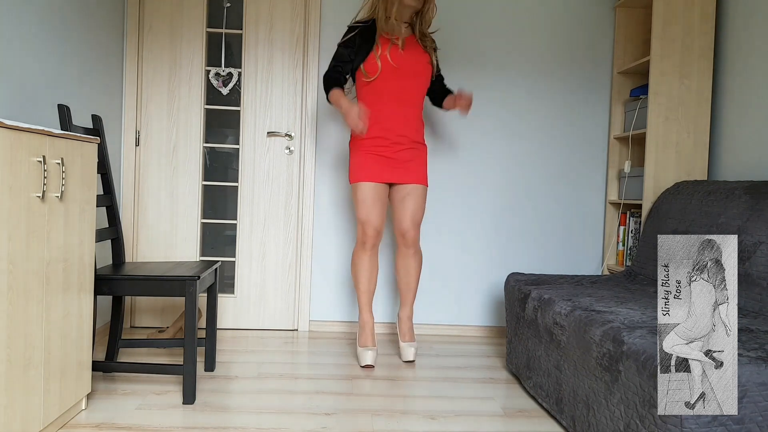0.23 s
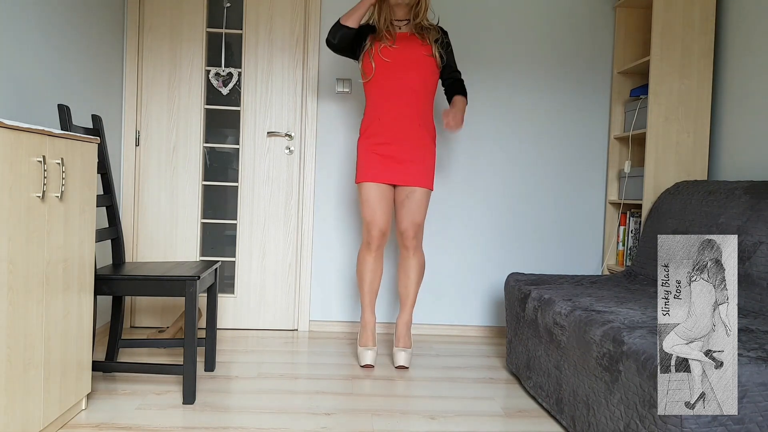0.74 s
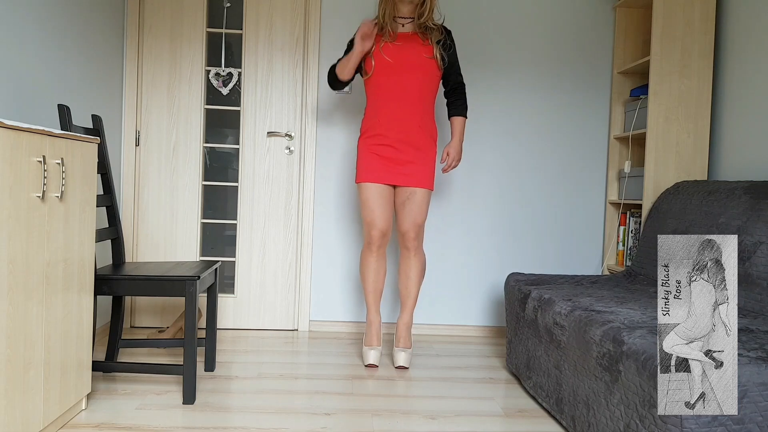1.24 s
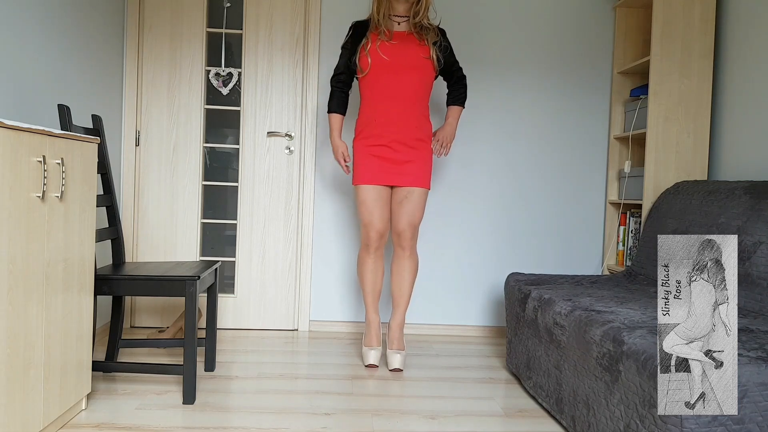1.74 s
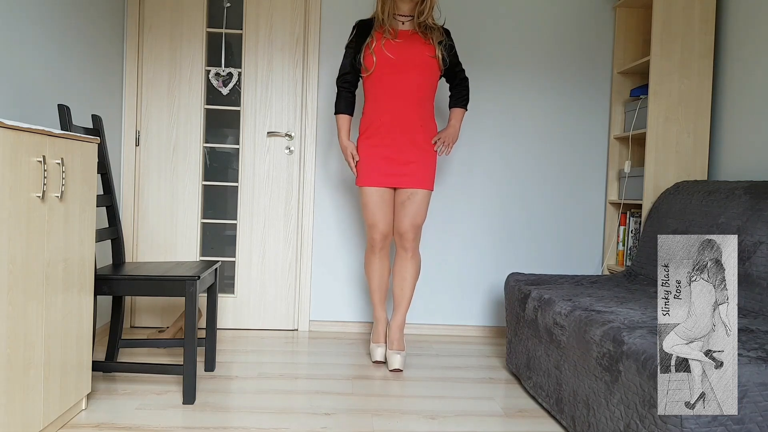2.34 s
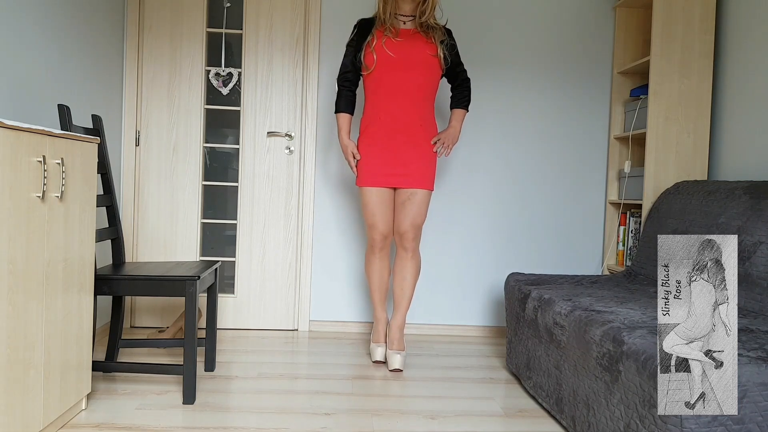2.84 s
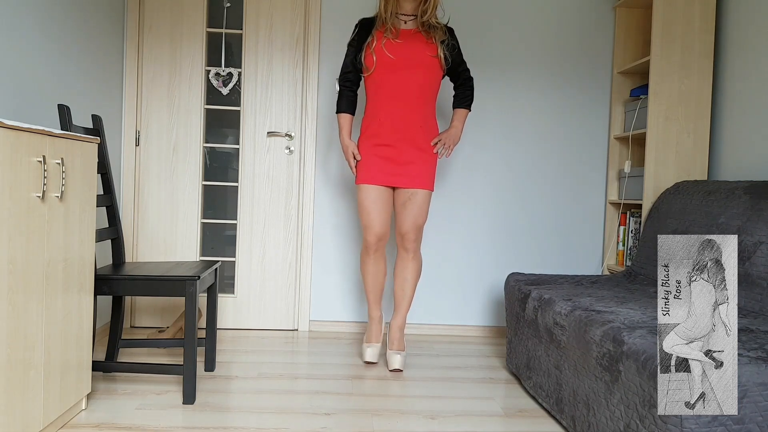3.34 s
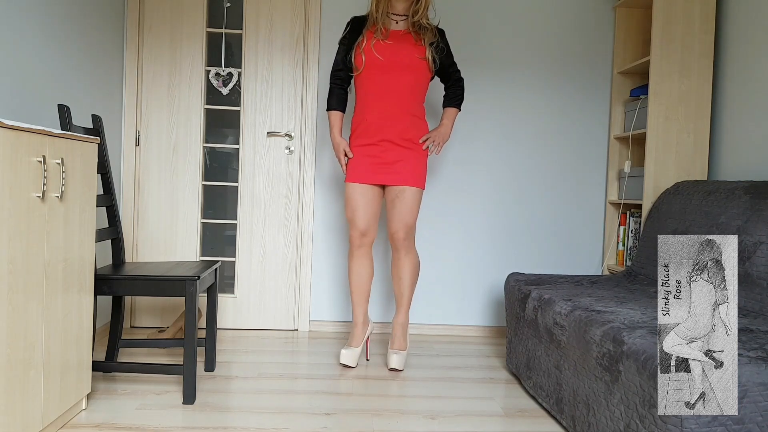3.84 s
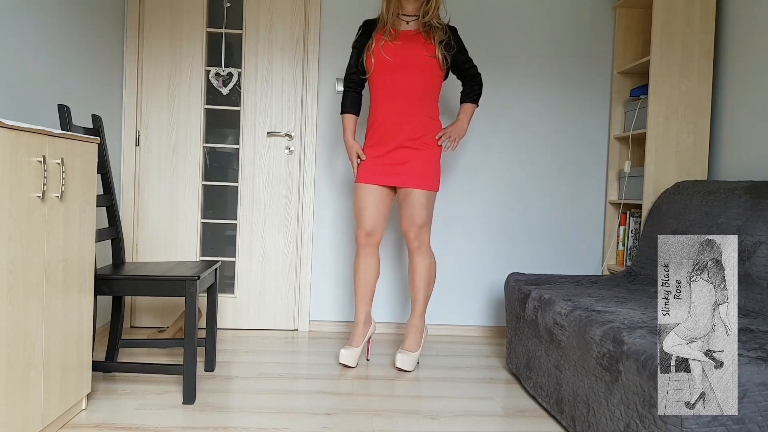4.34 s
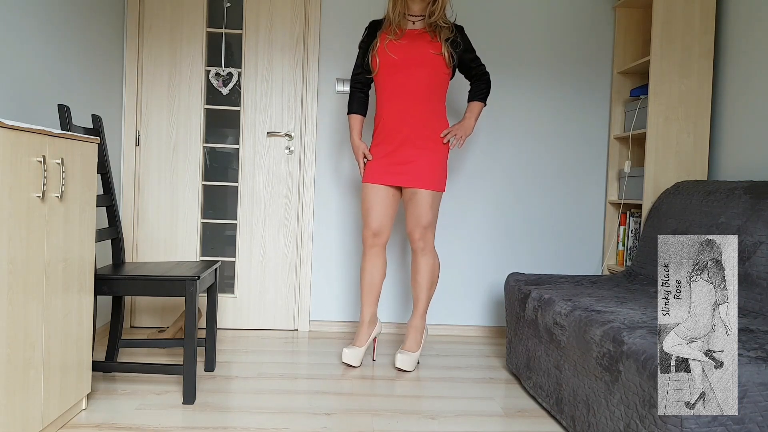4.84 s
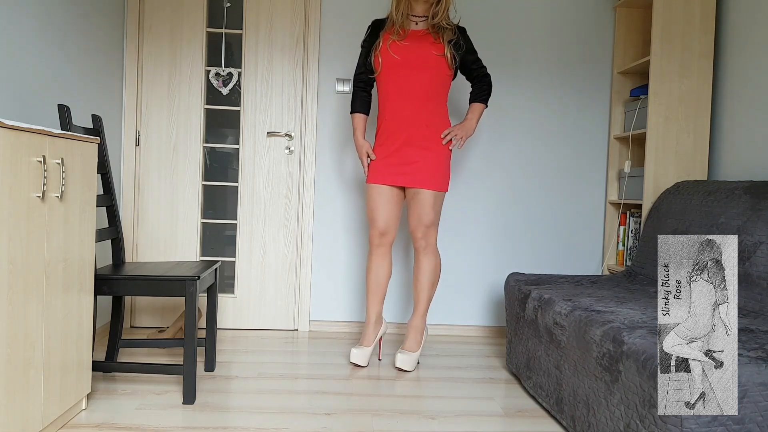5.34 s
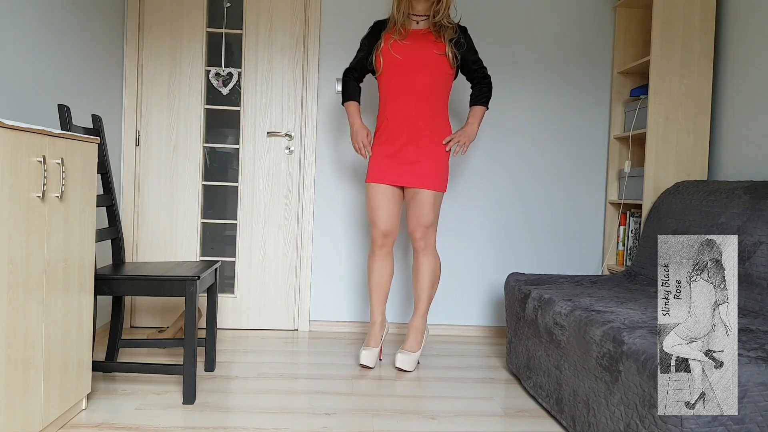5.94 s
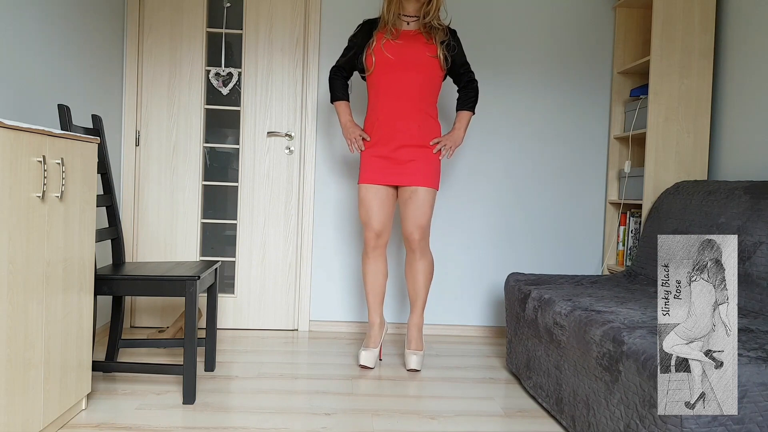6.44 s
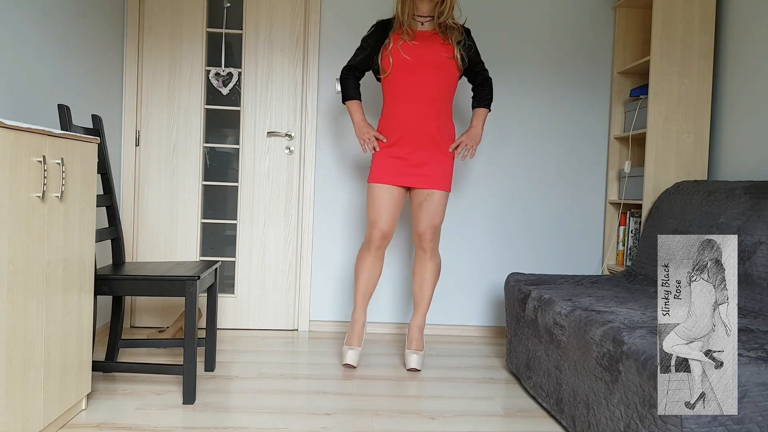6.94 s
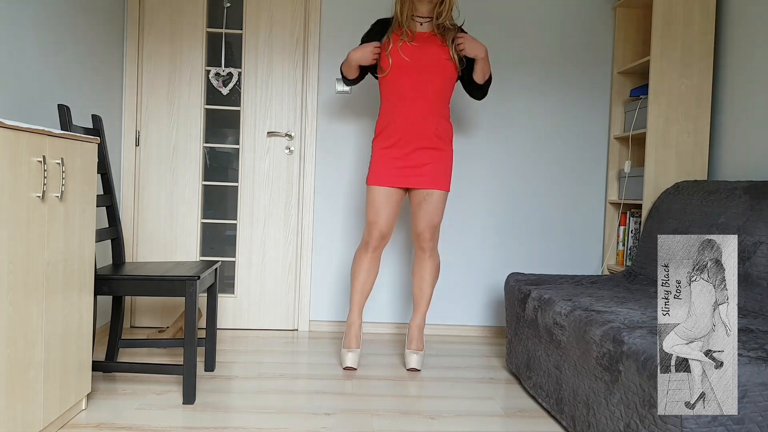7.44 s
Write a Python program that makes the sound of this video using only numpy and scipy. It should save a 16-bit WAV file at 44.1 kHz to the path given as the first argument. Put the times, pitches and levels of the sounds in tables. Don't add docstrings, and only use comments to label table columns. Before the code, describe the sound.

A person in high heels shifts in place on a laminate floor in a small furnished room. Sharp, woody heel knocks fall irregularly, the strongest at the start, half a second, just after four and five seconds, and near seven. Lighter taps, short scuffs and faint board creaks fill some gaps. The microphone stands a few metres away, catching short room reverberation over low hum and soft hiss.

```python
import sys
import numpy as np
from scipy import signal
from scipy.fft import rfft, irfft, next_fast_len
from scipy.io import wavfile
from scipy.ndimage import uniform_filter1d, map_coordinates

SR = 44100
rng = np.random.default_rng(int(sys.argv[2]) if len(sys.argv) > 2 else 0)


def ratio(d):
    e = np.asarray(d, float) / 20
    return 10 ** e


def put_to_file(sound):
    columns = np.atleast_2d(sound).T
    safe = np.clip(columns, -1, 1)
    whole_steps = np.round(safe * 32767)
    wavfile.write(sys.argv[1], SR, whole_steps.astype(np.int16))


N = 339744

# (delay [ms], level [dB], left-right difference [dB], left lag [ms])
NEAR_WALLS = [(0, -1, 0, 0), (1.9, -5, 1, -.4), (3.5, 0, 1, 0), (4.6, -4, 1, -.2), (5.8, -3, 0, -.3),
              (7.3, -5, 0, .2), (9.2, 0, 0, 0), (11.3, -3, 0, -.2)]
# (delay [ms], level [dB], left-right difference [dB], left lag [ms])
FAR_WALL = [(13.3, 1, -2, 0), (15.2, -3, 0, .1)]
# (frequency [Hz], level [dB], decay time T60 [s])
ROOM_MODES = [(173.6, -4.5, 0.36), (239, -25, 1), (266.6, -7, 0.35), (317, -1, 0.15), (369.4, -1.5, 0.13),
              (390, -16, 0.57), (502, -14, 0.62), (546, 0, 0.23), (580, -18, 0.28), (694, -2.5, 0.27),
              (774.3, 6, 0.17), (841, 3, 0.22), (1020, -18, 0.22)]
# (frequency [Hz], decay time T60 [s])
TAIL_DECAY = [(100, 0.27), (260, 0.43), (700, 0.28), (1800, 0.59), (5000, 0.91), (12000, 0.73)]
# (frequency [Hz], correlation [-1 to 1])
TAIL_LIKENESS = [(60, 0.64), (180, 1), (550, 0.69), (1650, 0.1), (4960, 0.094), (15000, 0.16)]
# (time [s], level [dB], board pitch [Hz],
# relative thud [dB], relative far wall [dB])
STEPS = [(-0.012, -28.5, 540, -20.5, 2), (0.5165, -41, 474, -21, 7), (0.5262, -24, 506, -20.5, 2.5),
         (1.771, -36, 574, -16.5, 3), (1.8604, -41, 400, -14, -1), (2.2368, -37, 597, -15, 6),
         (2.489, -45, 635, -16, 2), (3.7103, -40.5, 580, -17, -9), (3.7475, -41.5, 653, -21, -4),
         (4.1684, -50, 473, -10, 10), (4.2401, -28, 563, -24.5, 5), (4.9227, -44.5, 556, -26, 8),
         (5.263, -30, 577, -24.5, 0), (6.5705, -39.5, 570, -15.5, 8), (6.7651, -34, 600, -27, 9),
         (7.2016, -31, 488, -17.5, -12)]
# (time [s], level [dB], board pitch [Hz], relative snap [dB])
TAPS = [(0.0453, -61, 525, -20), (0.2107, -64, 497, 3), (0.3203, -57, 380, 0), (0.9792, -52.5, 1020, 6),
        (1.156, -57, 676, -32), (1.194, -57.5, 610, -31), (1.2454, -53.5, 613, -34),
        (1.2915, -57, 650, -25), (1.554, -61, 438, -14), (1.5755, -58, 503, -12), (1.6042, -58.5, 760, 4),
        (1.868, -43, 880, -1.5), (2.1205, -62, 614, 6), (3.8795, -76, 524, -6), (3.9666, -61, 625, 2),
        (4.44, -64, 563, 1), (4.4724, -63.5, 805, 6), (4.611, -52, 600, -27), (4.7863, -58, 570, -12),
        (6.0859, -58.5, 433, -18), (6.397, -62, 500, -9), (6.4418, -56.5, 500, -1), (6.478, -57.5, 780, 2),
        (7.2275, -50.5, 530, -7), (7.5979, -61.5, 503, -7)]
# (frequency [Hz], level [dB])
HUM_SPECTRUM = [(12, -35), (20, -20), (22, -4), (82, -8), (117, -7), (265, -8), (401, -8), (576, -11.5),
                (653, -13.5), (1500, -15.5), (1950, -76), (3300, -120)]
# (frequency [Hz], width [Hz], level [dB])
HUM_MODES = [(45, 29, 3), (100, 4, 1.5), (330, 14.3, 7.5), (428, 8.3, 9.5), (668, 16, 6.5)]
# (frequency [Hz], correlation [-1 to 1])
HUM_LIKENESS = [(30, 0.9), (60, 0.63), (180, 0.72), (550, 0.63), (1650, -0.059), (4960, -0.65),
                (15000, -0.56)]
# (frequency [Hz], density [dB per Hz])
HISS_SPECTRUM = [(900, -34), (1500, -7.5), (1700, 0), (2600, -4), (4000, -10), (5500, -11.5), (7000, -15.5),
                 (8500, -16.5), (10000, -18), (12000, -12.5), (13500, -11), (14500, -11.5)]
# (time [s], peak level [dB], relative brightness [dB], relative fizz [dB])
TIP_CLICKS = [(.002, -43.5, -5, -24), (0.213, -57.5, -6, -13), (.32, -49.5, -29, -37),
              (0.5176, -49.5, 5, -22), (.526, -36.5, -2, -12.5), (0.536, -62, -4, -5.5),
              (.979, -52.5, -4, -18), (1.602, -54.5, -16, -25), (1.771, -49, -4, -21),
              (1.861, -54.5, -5, -13), (2.12, -56.5, -0.5, -16), (2.234, -46, -1, -44),
              (2.489, -54, -24, -23), (3.71, -53.5, -8, -15), (3.748, -65, 0, -14), (4.168, -55.5, -7, -14),
              (4.24, -41, -31, -24), (4.44, -57, -23, -25), (4.472, -58, -25, -25), (4.921, -55, -15, -22),
              (5.261, -45.5, -12, -31), (6.084, -67, -8, -14), (6.4053, -45.5, -4, -24),
              (6.417, -56, -8, -23), (6.443, -56, -20, -24), (6.57, -55, -3.5, -26), (6.762, -43, -20, -33),
              (7.201, -52.5, -5, -29), (7.228, -52, -8, -20), (7.598, -71, -8, -15)]
# (frequency [Hz], density [dB per Hz])
FIZZ_SPECTRUM = [(5000, 0), (7000, 0), (9000, 0), (11500, 3.5), (14500, 1)]
# (frequency [Hz], density [dB per Hz])
GRIT_SPECTRUM = [(1100, -37), (1700, 0), (2600, -3.5), (3500, -5.5), (5500, -10.5), (7500, -19),
                 (10000, -46)]
# (frequency [Hz], width [Hz], level [dB])
BOARD_MODES = [(324.6, 38, 2.5), (515, 85, -8.5), (723, 140, -11)]
# (middle time [s], length [s], rub level [dB], relative grit [dB], relative fizz [dB])
SLIDES = [(0.165, 0.13, -59, -13, -17), (0.73, 0.16, -58, -3.5, -9), (1.295, 0.3, -76, 3, -3.5),
          (1.59, 0.11, -67.5, -5, -11), (2.034, 0.14, -53.5, -11.5, -22), (2.135, 0.066, -56.5, -19, -21),
          (3.494, .12, -76, -3, 0), (3.94, .11, -55.5, -9.5, -19.5), (4.232, 0.036, -53.5, -19, -28),
          (4.47, 0.14, -66, -20, -20), (4.598, .1, -66.5, -2, -12), (4.818, 0.13, -74, 1.5, -24),
          (5.12, 0.16, -67, -2, -14), (5.55, 0.048, -89, 3, -3), (6.017, 0.088, -75.5, -2, -1),
          (6.388, 0.074, -61.5, -9, -21), (6.49, .08, -61, -22, -32), (6.717, 0.15, -50.5, -15, -30),
          (6.902, 0.087, -59, -9, -17), (7.124, 0.16, -72.5, 1.5, 0.5), (7.43, 0.24, -77, 3.5, -3),
          (7.6, 0.19, -68.5, -5.5, -11)]
# (middle time [s], length [s], level [dB], relative upper resonances [dB])
CREAKS = [(0.196, 0.19, -63, -7), (0.362, 0.042, -62.5, -1), (0.676, 0.28, -60, -9),
          (1.222, 0.15, -64, 4.5), (1.563, 0.15, -63, -9), (1.943, 0.089, -65.5, 4),
          (2.073, 0.12, -60.5, -3), (3.59, 0.06, -70, -17), (3.937, 0.14, -58, -1.5), (4.236, .04, -68, 6),
          (4.476, 0.11, -66, 2.5), (4.588, 0.082, -62, 4), (4.815, 0.2, -69.5, -1),
          (5.095, 0.081, -66.5, 7), (6.376, .11, -61.5, -2), (6.483, 0.072, -64, -2), (6.694, 0.22, -63, 2),
          (6.894, 0.066, -63, 5.5), (7.13, 0.059, -70, 0), (7.44, 0.045, -67, -4), (7.62, 0.14, -66, -15)]

LEAD, SPAN = SR // 10, 16384
STEP_FIRST_DB, TAP_FIRST_DB = 1.5, 4
STEP_SNAP_DB, TAP_THUD_DB, TAP_FAR_DB = -28, -17.5, -12
HUM_DB, HISS_DB = -63.5, -70.5
TICK, SPRAY_T60 = 5, 0.4
EDGE_DB, LINGER = -7.5, 1.42
TOP_HZ = 14550


def unit(x):
    return x / np.sqrt(np.mean(x ** 2) + 1e-20)


def along(points, hz):
    f, v = np.transpose(points)
    return np.interp(np.log(hz + 1), np.log(f + 1), v)


def filtered(x, response):
    m = next_fast_len(x.shape[-1] + 4096)
    spectrum = rfft(x, m) * response(np.fft.rfftfreq(m, 1 / SR))
    return irfft(spectrum, m)[..., :x.shape[-1]]


def resonance(f, hz, width_hz):
    damping = 1j * f * width_hz
    return damping / (hz * hz - f * f + damping)


def stereo(pair, likeness):
    def mid_side(f):
        angle = np.arccos(np.clip(along(likeness, f), -1, 1)) / 2
        return np.array([np.cos(angle), np.sin(angle)])

    mid, side = filtered(pair, mid_side)
    return np.array([mid + side, mid - side])


def wobble(rate):
    knots = rng.standard_normal(int(N * rate / SR) + 4)
    return map_coordinates(knots, [np.arange(N) * rate / SR])


def reflections(f, walls, scatter_db):
    ear = np.array([[0.5], [-0.5]])
    total = 0
    for ms, db, pan, lag in walls:
        level = ratio(db + rng.normal(0, scatter_db) + pan * ear)
        total = total + level * np.exp(-2j * np.pi * f * (ms + lag * ear) / 1000)
    return total


def tail(t):
    hz, u, z = signal.stft(rng.standard_normal((2, len(t))), SR, nperseg=256)
    decay = ratio(-60 * u / along(TAIL_DECAY, hz)[:, None])
    wash = signal.istft(z * decay, SR, nperseg=256)[1][:, :len(t)]
    ring = 0
    for hz, db, t60 in ROOM_MODES:
        level = ratio(db + rng.normal(0, 1.7) - 60 * t / t60)
        ring = ring + level * np.sin(2 * np.pi * (hz * t + rng.random((2, 1))))
    swell = 1 / (1 + np.exp((0.019 - t) / 0.005))
    return swell * stereo(ratio(-19.5) * wash + ratio(-39.5) * ring, TAIL_LIKENESS)


def add_blow(out, s, source, first_db, far_db):
    size = SPAN + SPAN // 4
    t, f = np.arange(SPAN) / SR, np.fft.rfftfreq(size, 1 / SR)
    near = ratio(first_db) * reflections(f, NEAR_WALLS[:3], scatter_db=2.1)
    near = near + reflections(f, NEAR_WALLS[3:], scatter_db=3.5)
    far = ratio(np.clip(far_db / 2, -6, 5)) * reflections(f, FAR_WALL, scatter_db=0.5)
    room = near + far + rfft(tail(t), size)
    out[:, LEAD + round(s * SR):][:, :SPAN] += irfft(source(f) * room)[:, :SPAN]


def heels():
    out = np.zeros((2, N + SR))
    blows = [(s, db, hz, STEP_SNAP_DB, thud_db, STEP_FIRST_DB, far_db)
             for s, db, hz, thud_db, far_db in STEPS]
    blows += [(*row, TAP_THUD_DB, TAP_FIRST_DB, TAP_FAR_DB) for row in TAPS]
    for s, db, hz, snap_db, thud_db, first_db, far_db in blows:
        def source(f):
            board = resonance(f, 1.027 * hz, 0.86 * hz) ** 2 / np.sqrt(hz / 500)
            board = board + ratio(-2.5) * resonance(f, 355, 133) * resonance(f, 470, 470)
            snap = ratio(snap_db + 1) * resonance(f, 1170, 900) ** 2
            thud = resonance(f, 158, 127) ** 2 - ratio(-5.5) * resonance(f, 110, 76) ** 2
            thud = ratio(thud_db + 10.5) * thud
            soft = 1 / (1 + 1j * f / 1700) ** 3
            return -ratio(db + 34.5) * (board - snap - thud) * soft

        add_blow(out, s, source, first_db, far_db)
    return out[:, LEAD:LEAD + N]


def room_hum():
    z = signal.stft(rng.standard_normal((2, N)), nperseg=512)[2]
    field = uniform_filter1d(rng.standard_normal(z.shape[1:]), 6, 0)
    field = uniform_filter1d(field, 12, 1)
    pair = signal.istft(z * ratio(1.7 * unit(field)), nperseg=512)[1][:, :N]

    def colour(f):
        peaks = sum(db * abs(resonance(f, hz, width)) ** 2 for hz, width, db in HUM_MODES)
        return ratio(along(HUM_SPECTRUM, f) + peaks)

    level = ratio(HUM_DB + 0.56 * wobble(4.306))
    return level * unit(filtered(stereo(pair, HUM_LIKENESS), colour))


def microphone_hiss():
    hiss = filtered(rng.standard_normal((2, N)), lambda f: ratio(along(HISS_SPECTRUM, f)))
    return ratio(HISS_DB + 0.06 * wobble(0.54)) * unit(hiss)


def tips():
    out, t = np.zeros((2, N + SR)), np.arange(SPAN) / SR
    for s, db, bright_db, fizz_db in TIP_CLICKS:
        spray = stereo(rng.standard_normal((2, SPAN)), TAIL_LIKENESS) * ratio(-60 * t / SPRAY_T60)
        spray *= 1 - 0.6 * np.exp(-t / 0.004)
        spray[:, 0] += TICK

        def colour(f):
            tick = resonance(f, 2110, 2190) ** 2
            low = ratio(3.5) * resonance(f, 1130, 550) ** 2
            bright = ratio(bright_db + 1) * resonance(f, 4420, 2720) ** 2
            balance_db = np.array([[-1.2], [1.2]])
            dust = ratio(fizz_db - 4.5 + along(FIZZ_SPECTRUM, f) + balance_db) * (f > 4000)
            return tick - low - bright + dust

        out[:, round(s * SR):][:, :SPAN] += ratio(db) * filtered(spray, colour)
    return out[:, :N]


def strokes(rows, db):
    grid = np.arange(0, N / SR + 0.002, 0.002)
    middle, length = np.transpose(rows)[:2, :, None]
    u = 2 * (grid - middle) / np.maximum(length, 0.02)
    u = u / np.where(grid > middle, LINGER, 1)
    gain = np.linalg.norm(ratio(db[:, None] + EDGE_DB * u ** 2), axis=0)
    return np.interp(np.arange(N) / SR, grid, gain)


def slips(rough_db):
    return stereo(rng.standard_normal((2, N)), TAIL_LIKENESS) * ratio(rough_db * wobble(90))


def creaking_boards(modes):
    def response(f):
        total = sum((-1) ** k * ratio(db) * resonance(f, hz, width) for k, (hz, width, db) in enumerate(modes))
        return total * resonance(f, 490, 600)

    return unit(filtered(slips(rough_db=2.5), response))


def creaks():
    level_db, upper_db = np.transpose(CREAKS)[2:]
    low = strokes(CREAKS, level_db) * creaking_boards(BOARD_MODES[:1])
    return low + strokes(CREAKS, level_db + upper_db) * creaking_boards(BOARD_MODES[1:])


def scuffs():
    def rub_colour(f):
        return resonance(f, 1000, 760) ** 2 - ratio(-18.5) * resonance(f, 2270, 760) ** 2

    rub = filtered(slips(rough_db=1.45), rub_colour)
    grit = filtered(slips(rough_db=0.5), lambda f: ratio(along(GRIT_SPECTRUM, f)) * (f > 900))
    fizz = filtered(slips(rough_db=0), lambda f: ratio(along(FIZZ_SPECTRUM, f)) * (f > 4000))
    rub_db, grit_db, fizz_db = np.transpose(SLIDES)[2:]
    out = strokes(SLIDES, rub_db) * unit(rub)
    out = out + strokes(SLIDES, rub_db + grit_db) * unit(grit)
    return out + strokes(SLIDES, rub_db + fizz_db) * unit(fizz)


def scene():
    return heels() + room_hum() + microphone_hiss() + tips() + creaks() + scuffs()


def low_pass(x):
    return signal.sosfilt(signal.butter(12, 15570, fs=SR, output="sos"), x)


def record(dry):
    def microphone(f):
        bass_cut = 1j * f / (35 + 1j * f)
        return bass_cut * (f < TOP_HZ)

    mix = filtered(dry, microphone) - 0.0005
    return low_pass(mix)


dry = scene()
out = record(dry)
put_to_file(out)
```